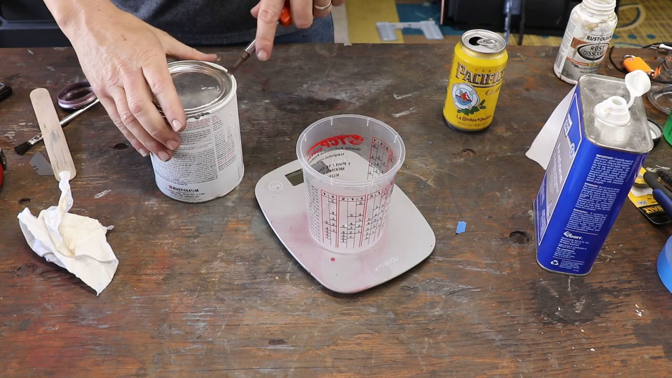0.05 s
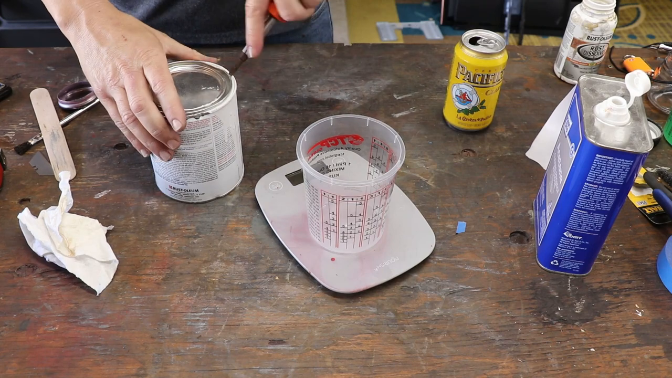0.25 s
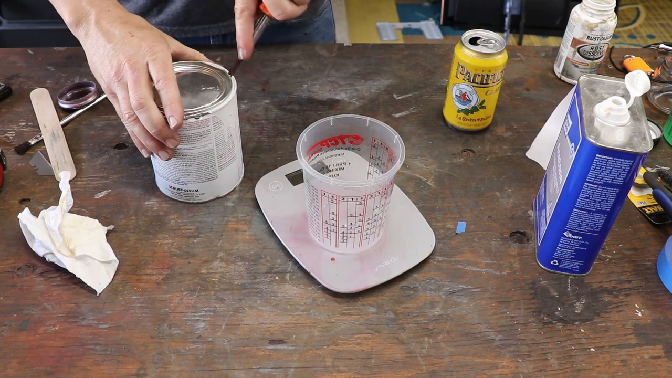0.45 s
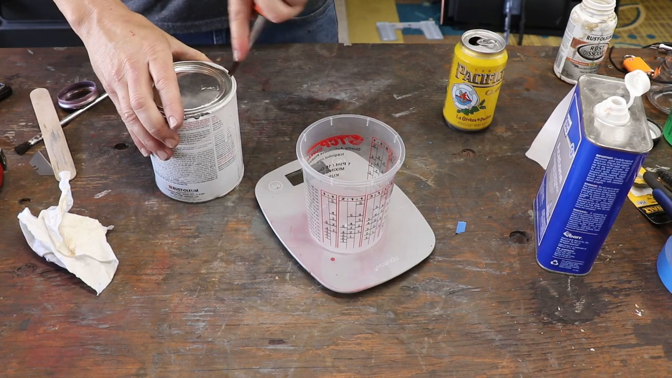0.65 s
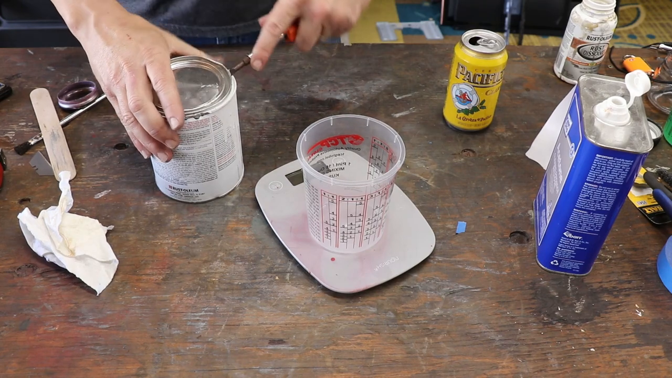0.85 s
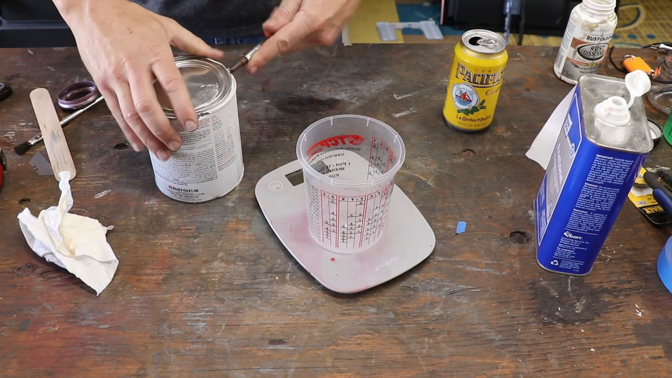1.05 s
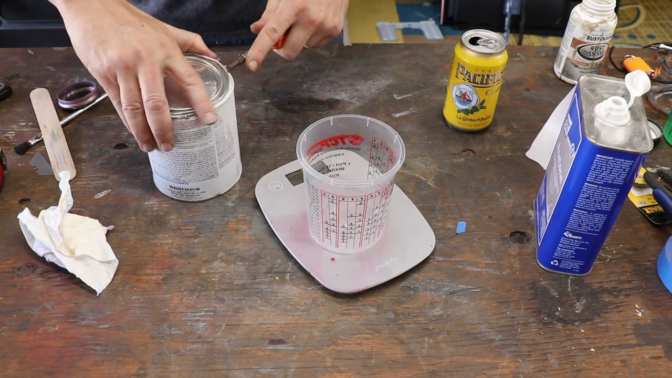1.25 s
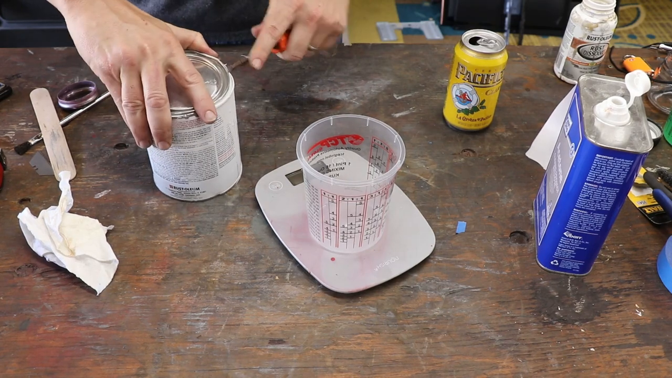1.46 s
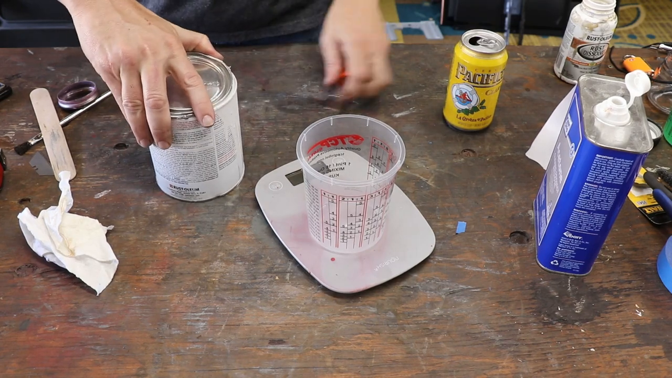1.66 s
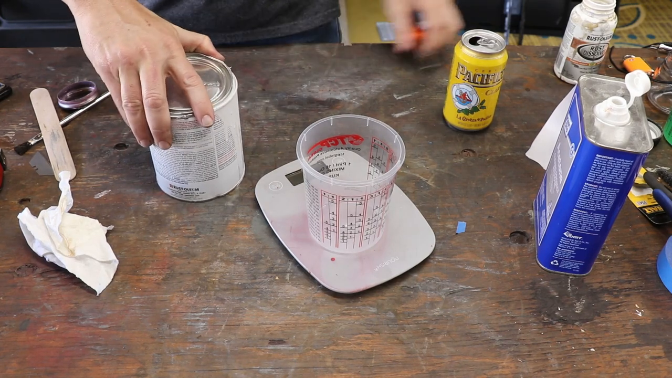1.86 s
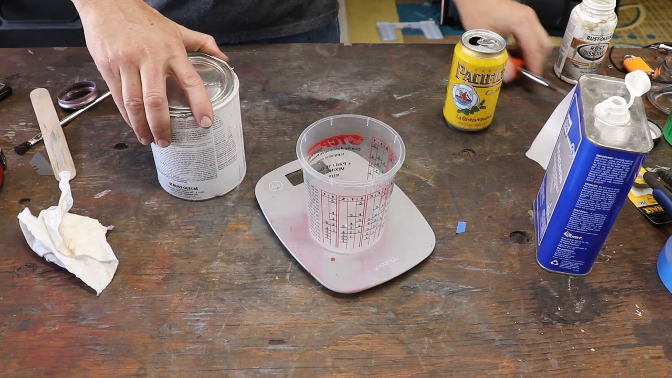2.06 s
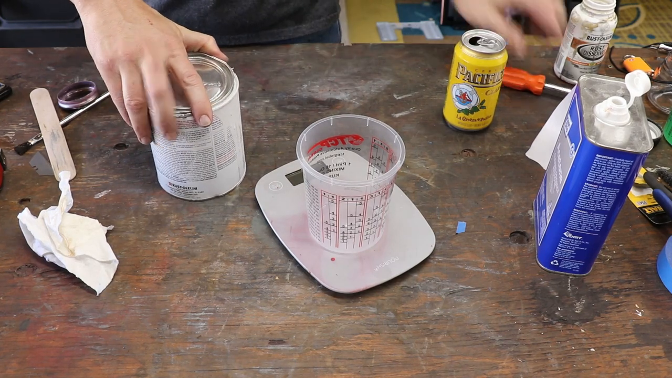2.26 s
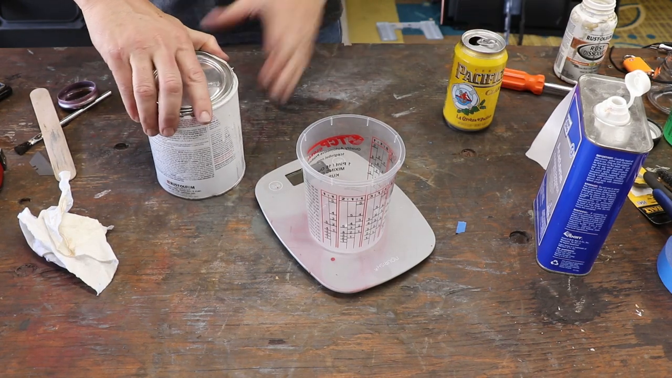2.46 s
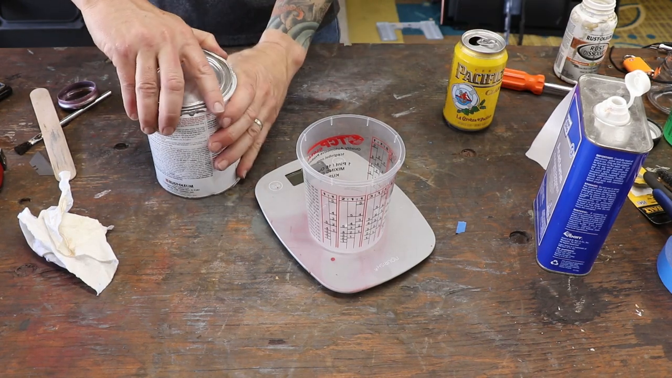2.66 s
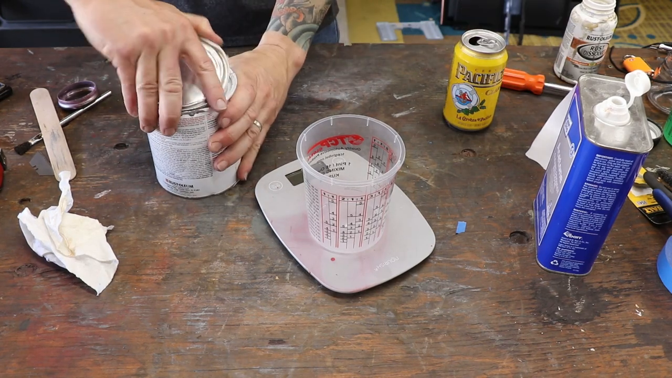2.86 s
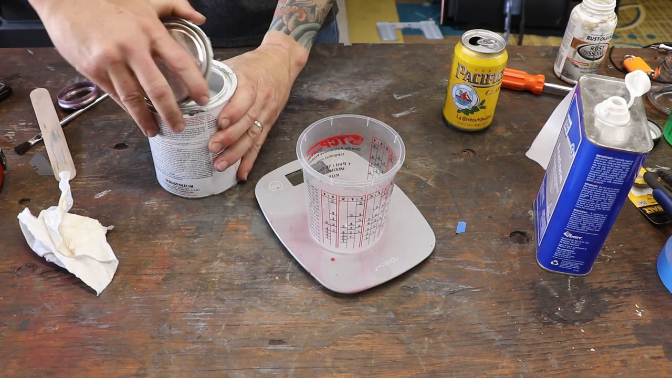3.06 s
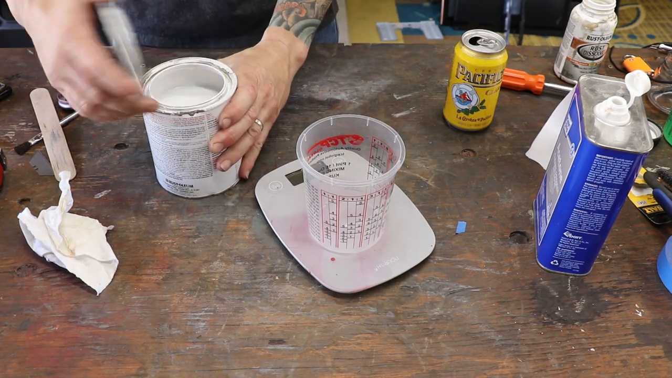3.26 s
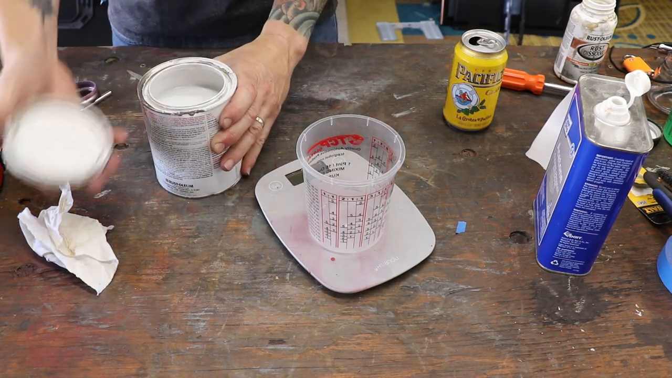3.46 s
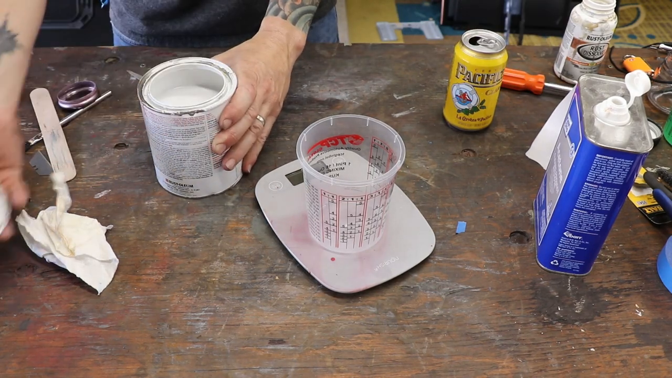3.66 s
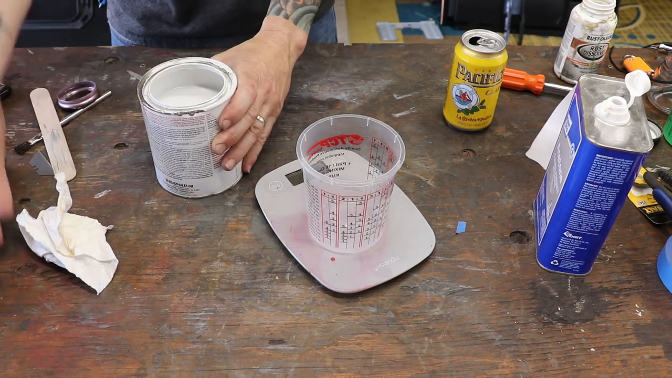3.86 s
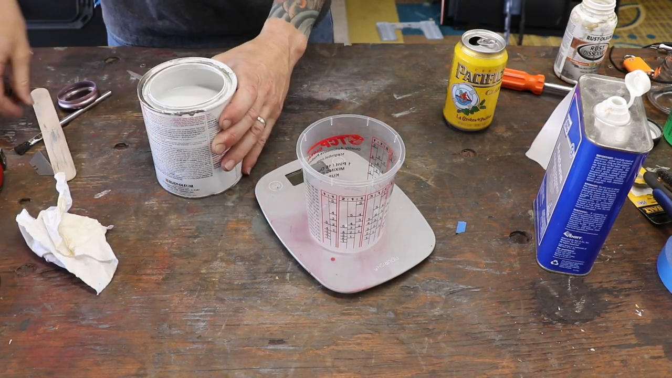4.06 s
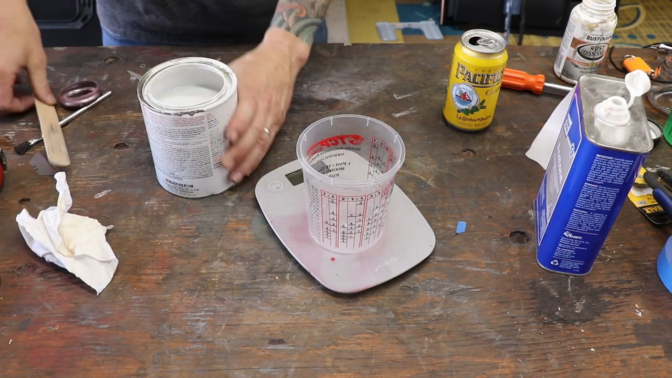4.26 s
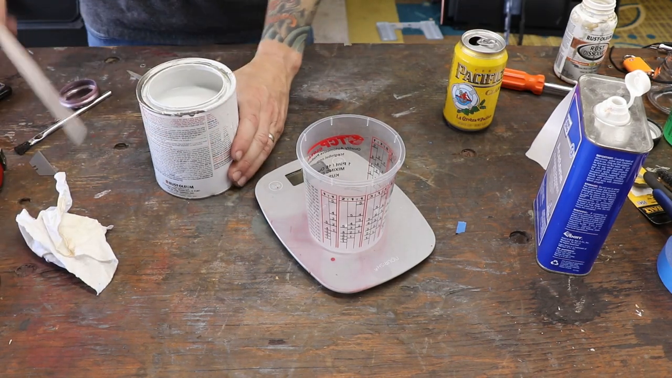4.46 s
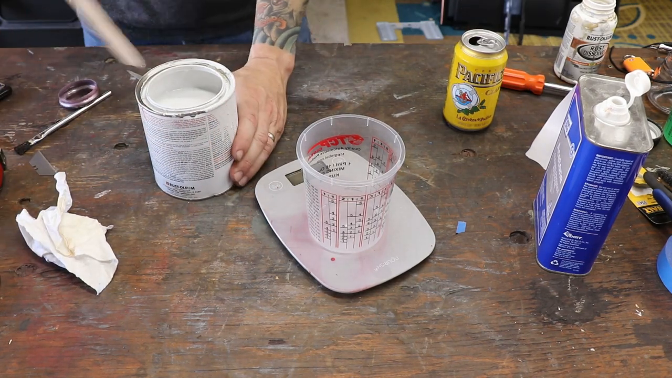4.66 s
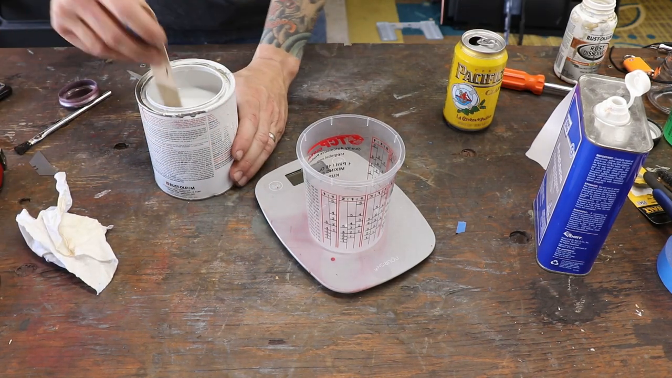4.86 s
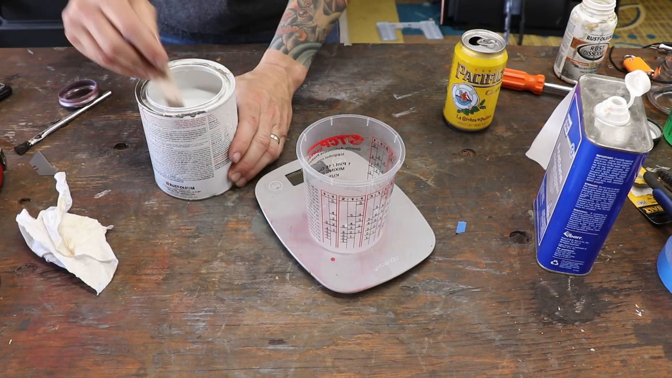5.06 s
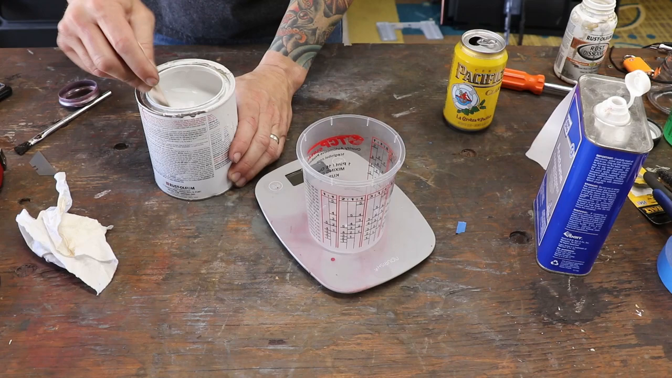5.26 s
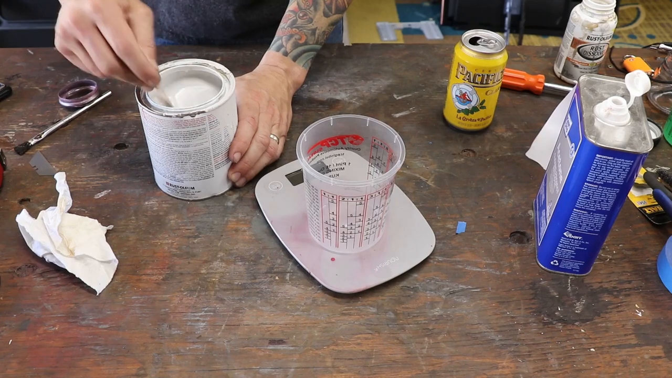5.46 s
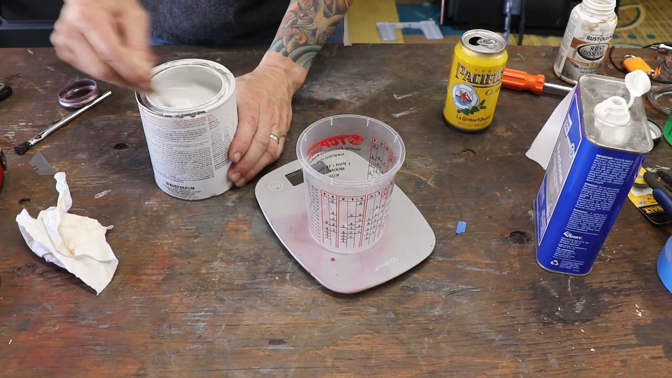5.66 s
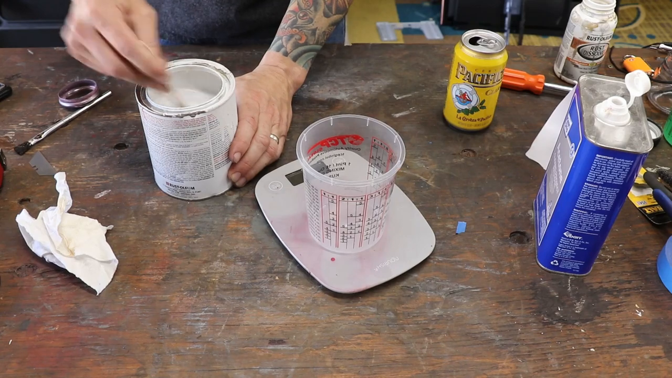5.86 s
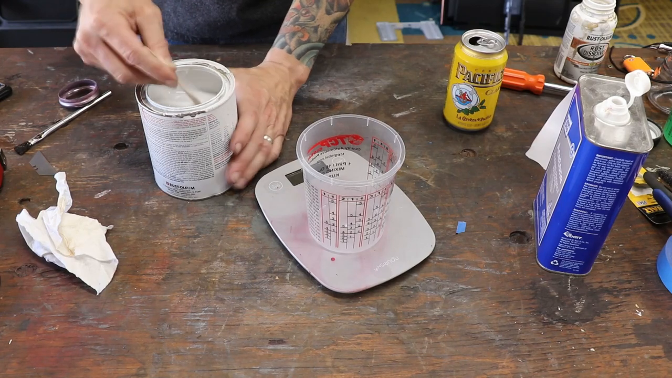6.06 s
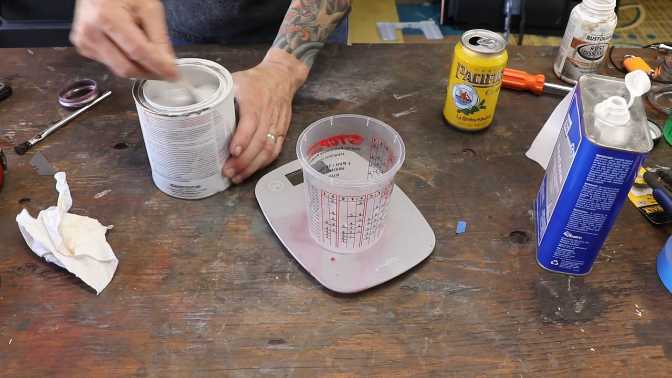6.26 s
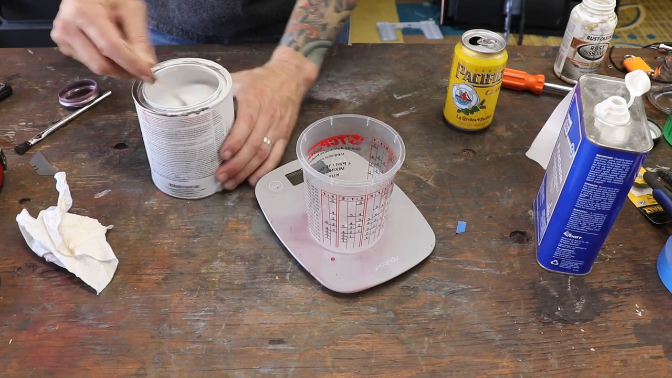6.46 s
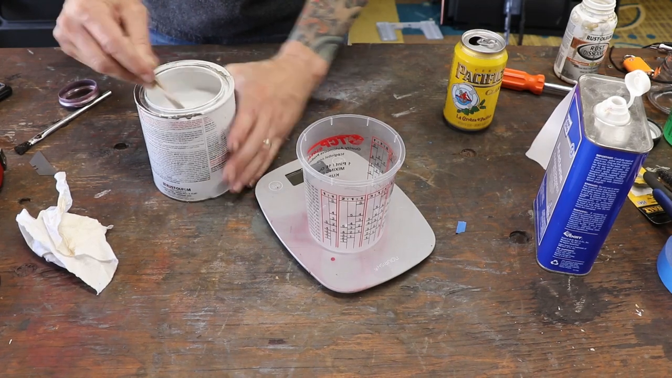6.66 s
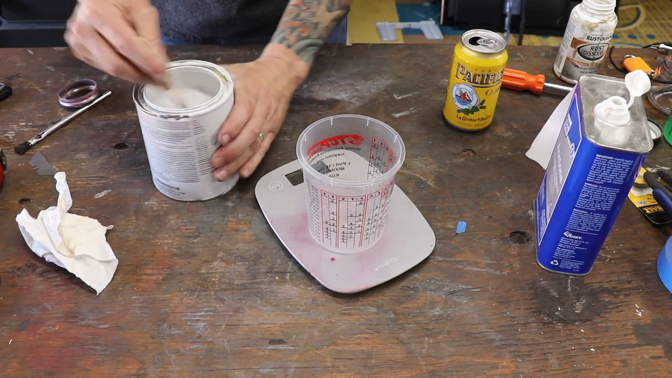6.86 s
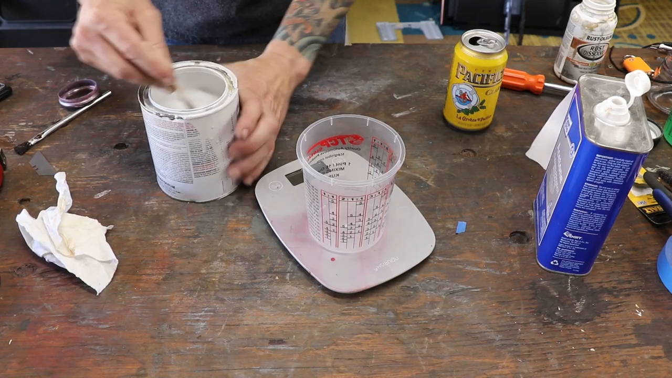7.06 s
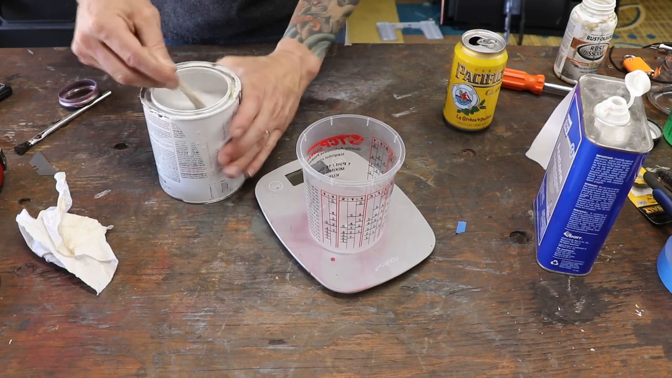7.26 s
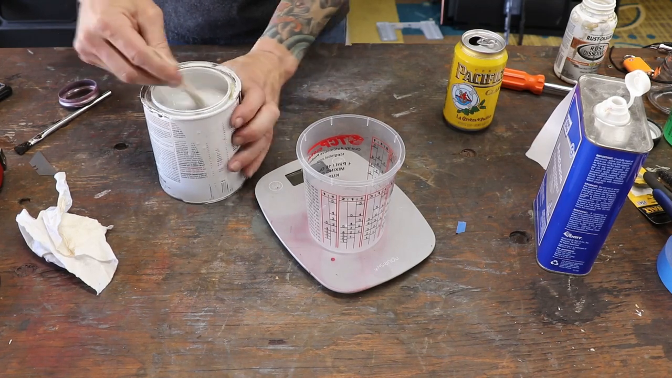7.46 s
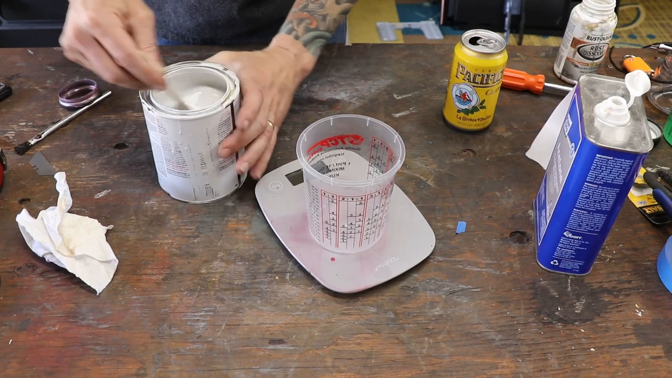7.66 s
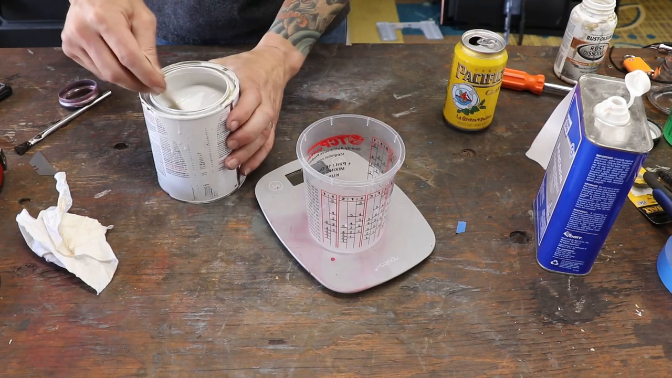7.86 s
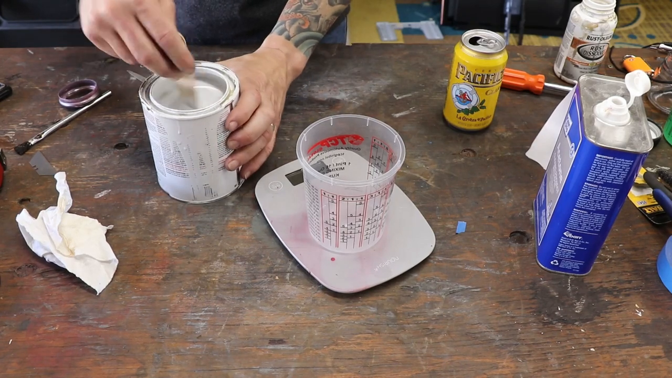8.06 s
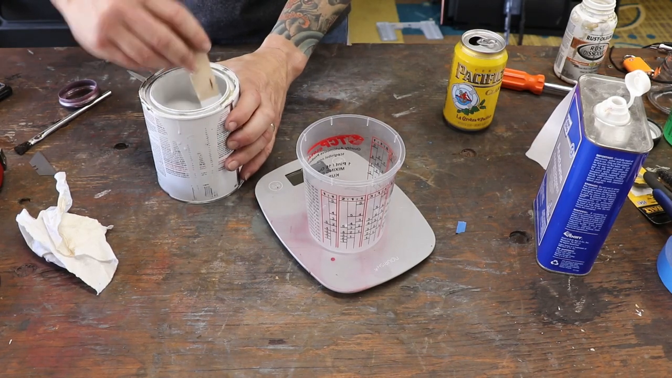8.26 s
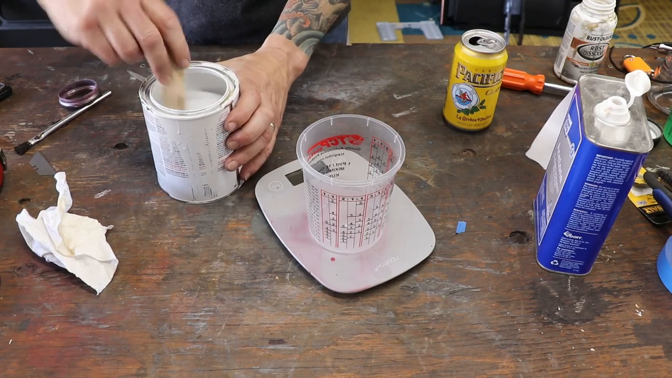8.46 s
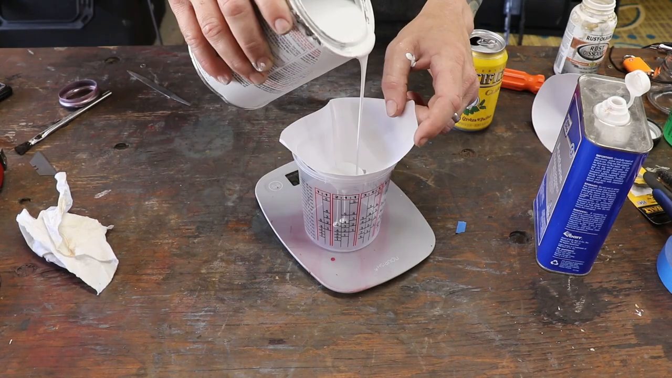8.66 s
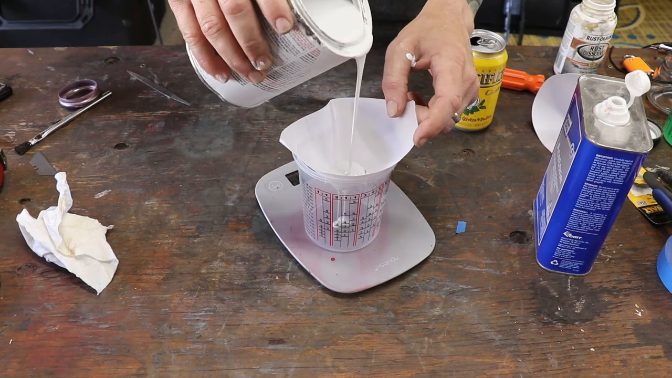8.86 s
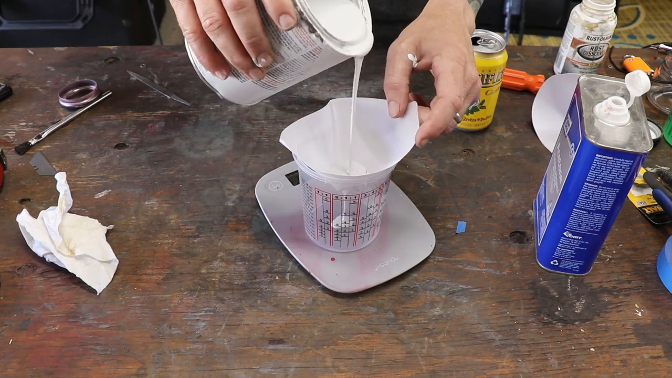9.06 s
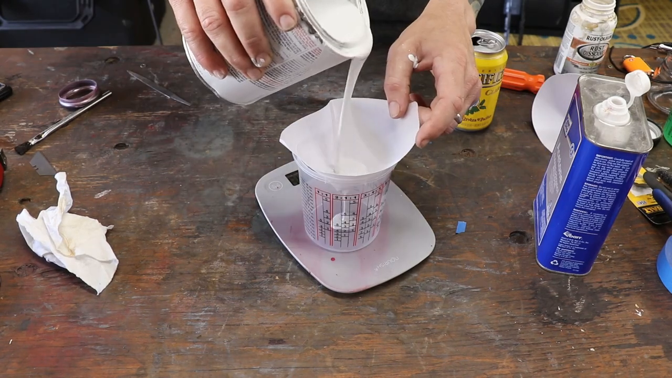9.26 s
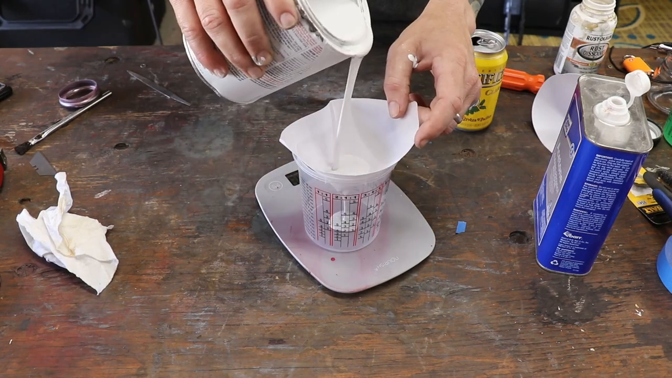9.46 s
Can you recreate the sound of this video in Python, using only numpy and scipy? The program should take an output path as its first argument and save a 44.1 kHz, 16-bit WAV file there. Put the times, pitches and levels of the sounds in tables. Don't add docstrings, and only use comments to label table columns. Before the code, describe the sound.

Screwdriver knocks at a full paint can, drops and rattles on the bench, lid pops off and clatters ringing, then a stick knocks while stirring.

```python
import sys
import numpy as np
from scipy import signal
from scipy.io import wavfile
from scipy.ndimage import uniform_filter1d, map_coordinates

SR = 44100
rng = np.random.default_rng(int(sys.argv[2]) if len(sys.argv) > 2 else 0)


def int16_out(signal):
    q = np.round(np.clip(np.atleast_2d(signal).T, -1, 1) * 32767)
    wavfile.write(sys.argv[1], SR, q.astype(np.int16))


N = 420273

# (time [s], knock level [dB], thump level [dB], clink level [dB])
PRYING = [(0.009, -10.5, -28, -25), (0.044, -23, -35, -100), (0.158, -20, -28.5, -39.5),
          (0.439, -34, -56, -54), (0.537, -46, -53, -54), (0.664, -41, -53, -57), (1.173, -48, -54, -56),
          (1.462, -46, -45, -73), (1.513, -27, -34, -48), (1.545, -39, -53, -61), (1.709, -38, -58, -48.5),
          (2.747, -41, -69, -51), (2.814, -53, -75, -64), (2.887, -58, -63, -54)]
# (time [s], knock level [dB], thump level [dB], clink level [dB])
DRIVER_DROP = [
    (2.058, -4, -7.5, -25.5),
    (2.206, -12.5, -10.5, -28),
    (2.226, -11.5, -14, -52),
    (2.271, -5, -29, -45),
    (2.281, -8.5, -26, -25),
    (2.319, -8, -21.5, -31),
    (2.347, -33, -40, -52),
    (2.393, -50, -48, -65),
]
# (time [s], knock level [dB], thump level [dB], clink level [dB])
LID_POP = [
    (2.943, -1.5, -17.5, -15),
]
# (time [s], knock level [dB], thump level [dB], clink level [dB])
LID_LIFT = [
    (3.05, -8.5, -23.5, -37),
    (3.205, -40, -52, -64),
    (3.53, -50, -68, -67),
]
# (time [s], knock level [dB], thump level [dB], clink level [dB])
LID_LANDS = [
    (3.804, -6, -25, -16),
    (3.859, -12, -50, -23),
]
# (time [s], knock level [dB], thump level [dB], clink level [dB])
LID_FALLS_FLAT = [
    (3.943, -21, -23.5, -12),
    (4.004, -12, -66, -18.5),
]
# (time [s], knock level [dB], thump level [dB], clink level [dB])
STICK_LIFT = [
    (4.198, -34, -32.5, -62.5),
    (4.227, -31, -29.5, -34.5),
]
# (time [s], knock level [dB], thump level [dB], clink level [dB])
STICK = [
    (4.344, -33, -54, -43.5),
    (4.562, -34, -44.5, -47),
    (4.934, -41, -66, -44),
    (4.964, -35, -46, -49),
    (5.002, -42, -48, -52),
    (5.081, -24, -60, -51),
]
# (time [s], knock level [dB], thump level [dB], clink level [dB])
STIRRING = [(5.126, -25.5, -29, -45), (5.304, -46, -35, -85), (5.41, -47, -65, -66), (5.734, -18, -27, -36),
            (5.906, -12, -36.5, -29), (6.078, -17, -22.5, -32), (6.223, -22.5, -51, -39.5),
            (6.254, -12.5, -15.5, -29.5), (6.389, -24.5, -84, -41.5), (6.421, -13, -18.5, -24),
            (6.539, -25, -37, -46), (6.583, -17, -14, -23), (6.743, -18.5, -16, -26.5),
            (6.887, -25, -43, -39.5), (6.924, -17, -14, -38.5), (7.016, -24, -23, -36),
            (7.093, -15, -13, -26.5), (7.264, -28, -33, -46), (7.45, -22.5, -21.5, -36.5),
            (7.625, -24, -28.5, -72), (7.644, -54, -41, -50), (7.801, -20, -19.5, -35),
            (7.912, -37, -39.5, -73), (8.036, -44, -30.5, -72), (8.184, -31, -40, -58),
            (8.271, -12.5, -74, -39.5), (8.312, -28, -24, -63)]
# (time [s], knock level [dB], thump level [dB], clink level [dB])
THUDS = [
    (0.252, -36, -31, -81),
    (0.982, -94, -32, -77),
    (1.248, -28, -35, -54),
    (2.671, -35, -21, -60),
    (5.553, -29.5, -19.5, -83),
    (5.734, -30, -29, -45),
]
# (time [s], knock level [dB], thump level [dB], clink level [dB])
TIP_SLIPS = [
    (0.757, -48, -69, -45),
    (0.767, -30, -67, -48),
    (0.782, -33, -52, -59),
    (1.261, -30, -40, -47.5),
    (1.399, -34, -60, -70),
    (6.328, -32, -68, -43.5),
    (7.016, -20, -17.5, -42),
]
BLOW_BANDS_HZ = (1200, 250, 3700, 9000)

# (frequency [Hz], level [dB], t60 [s])
FULL_CAN = [(109.6, -2.5, 0.3), (294.7, 9.5, 0.12), (276.2, 2.5, 0.28), (340.5, -5, 0.3), (570, -5, 0.065),
            (764, -15.5, 0.6), (864, -3.5, 0.058), (1406, -11.5, 0.22), (1370, 5, 0.0084),
            (2095, -9.5, 0.056), (2420, -15, 0.34), (2346, -0.5, 0.058), (3326, -1, 0.075)]
# (frequency [Hz], level [dB], t60 [s])
BENCH = [(120.5, -18, 0.47), (205, -32, 0.068), (291, 15.5, 0.092), (297.4, -3.5, 0.85), (360, 1.5, 0.48),
         (513, -10, 0.3), (653, -1.5, 0.18), (815, -13, 0.71), (965, -32, 0.18), (1470, -18, 0.12),
         (1600, -8, 0.41), (1890, -24, 0.31), (3120, -13, .15)]
# (frequency [Hz], level [dB], t60 [s])
BENCH_TOP = [(83.5, 3, 0.076), (113, 5, 0.19), (160, -2, 0.16), (259, -5, 0.18), (375, -3, 0.12)]
# (frequency [Hz], level [dB], t60 [s])
DRIVER_HANDLE = [(284, -16, 0.25), (501, 4.5, 0.17), (700, 7, 0.043), (774, -5, 0.065), (872, 1, 0.12),
                 (1105, -10, 0.039), (1620, -2, 0.07), (1990, -1.5, 0.059), (3160, -1, .15)]
# (frequency [Hz], level [dB], t60 [s])
PRIED_LID = [(478, 0.5, 0.21), (642, 1.5, 0.059), (721, 0, 0.32), (999, -2, 0.098), (1201, -12.5, 0.11),
             (1500, -14.5, 0.2), (3260, 13, 0.027), (3830, 13, 0.031)]
SEATED_LID_HZ = [388, 615, 985, 1340, 1669, 1655, 1841, 2190, 2724, 2840, 3174, 3190, 3408]
# (level [dB], t60 [s])
SEATED_LID = [(-0.5, 0.13), (-20, 0.049), (-5.5, 0.29), (-7, 0.097), (10.5, 0.022), (-19, 0.23),
              (-18, 0.25), (-20, 0.24), (-21, 0.26), (-19, 0.17), (12, 0.045), (8, 0.19), (-1, 0.18)]
# (frequency [Hz], level [dB], t60 [s])
LID_RIM = [(9800, 6, .01), (11500, 7, .008), (13200, 8, .008)]
# (frequency [Hz], level [dB], t60 [s])
OPEN_CAN = [(172, 7.5, 0.092), (493, 0.5, 0.15), (935, -6.5, 0.15)]
EDGE_LID_HZ = [345, 700, 1045, 1260, 1680, 2051, 2918, 3157, 3262, 3569, 3849, 3967, 6590]
# (level [dB], t60 [s])
LID_ON_EDGE = [(1, 0.17), (16, 0.027), (8, 0.24), (-18, 0.77), (-5, 0.32), (-19, 0.46), (-12, 0.26),
               (-6, 0.35), (-14, .14), (2, 0.68), (-16, .3), (-8, 0.41), (-14, 0.14)]
FREE_LID_HZ = [1047, 1681, 2042, 2088, 2420, 2897, 3255, 3566, 4250, 4521, 4705, 6585, 6640, 8220]
# (level [dB], t60 [s])
FREE_LID = [(2, 0.29), (-8, 0.49), (-3, 0.38), (-2, 0.34), (11, 0.041), (-4, 0.32), (5.5, 0.12),
            (-3.5, 0.21), (-5, 0.22), (-5, 0.2), (-11, 0.13), (4.5, 0.14), (-2, 0.31), (-17, .12)]
FLAT_LID_HZ = [1453, 1647, 1690, 2131, 2460, 2600, 2897, 3150, 3671, 4043, 4255, 4519, 5728, 6589]
# (level [dB], t60 [s])
FLAT_LID = [(-13.5, 0.33), (-10, 0.42), (5, 0.092), (2.5, 0.29), (-14, .3), (-16, 0.47), (8.5, 0.364),
            (-4, 0.31), (-24, 0.22), (-9, 0.29), (-6, 0.16), (-10, 0.35), (-6, 0.3), (12, 0.15)]
# (frequency [Hz], level [dB], t60 [s])
LID_SHIMMER = [(4860, -10, 0.34), (5030, -7, .3), (5470, -1, .15), (5745, -5, 0.35), (6400, -3, 0.23),
               (6850, -6, .25), (7200, -14, .15), (7600, -2, .18), (7730, -9, .25), (7876, -9, 0.15),
               (8200, -7, .25), (8300, -10, .22), (9400, -7, 0.11), (9700, -12, 0.13)]
# (frequency [Hz], level [dB], t60 [s])
WOOD_STICK = [(368, 2.5, 0.13), (2140, -12, 0.082), (3270, -12, 0.085), (5960, 3, 0.031), (7350, -6, 0.052),
              (8100, -5, 0.043)]

# (time [s], frequency [Hz], level [dB])
CHIRPS = [
    (0.534, 2260, -35),
    (1.174, 2340, -38),
    (4.993, 2116, -33),
]
# (time [s], low level [dB], low frequency [Hz], high frequency [Hz], high level [dB])
WALL_NOTES = [(5.127, -24.5, 787, 2040, -46), (5.734, -20.5, 823, 2300, -28),
              (5.908, -25, 790, 2410, -27.5), (6.078, -27, 776, 2450, -43), (6.255, -17, 564, 2280, -28),
              (6.421, -16, 855, 2080, -20.5), (6.584, -21, 774, 2040, -26), (6.744, -19.5, 870, 2100, -24),
              (6.924, -21, 850, 2160, -32.5), (7.017, -23, 640, 2420, -57), (7.095, -11.5, 535, 2240, -38),
              (7.263, -36, 558, 2470, -46), (7.452, -32, 760, 2475, -28.5), (7.625, -33, 790, 2200, -48),
              (7.8, -23, 595, 1910, -51), (8.312, -23, 816, 2330, -44)]
# (time [s], frequency [Hz], level [dB], t60 [s])
CAN_NOTES = [(0.011, 647, -13.5, .06), (0.011, 1002, -29, .2), (0.012, 1415, -36, 0.35),
             (.047, 598, -27, 0.14), (0.048, 441, -22, 0.095), (2.283, 920, -18, 0.089),
             (2.322, 282.6, -18.5, 0.29), (2.944, 1669, -24, 0.018), (2.946, 1680, -26, 0.31),
             (3.806, 364, -20, 0.13), (1.515, 700, -33.5, .15), (2.323, 750, -19, .06),
             (2.946, 985, -22, 0.2), (2.945, 3177, -10.5, 0.061), (2.945, 2260, -16, .03),
             (3.806, 1045, -12, 0.25), (4.006, 2897, -23.5, 0.47), (5.086, 800, -45, 0.073),
             (5.16, 332, -38, 0.23), (5.305, 800, -36, 0.046), (5.345, 150, -33, .08),
             (5.365, 377, -35, 0.17), (6.255, 900, -25.5, .2), (6.46, 1370, -34, 0.13),
             (5.736, 359, -16.5, 0.17), (5.772, 401, -24, 0.14), (5.95, 324, -30, .2),
             (5.913, 546, -31, 0.098), (6.748, 1715, -29, 0.091), (7.02, 550, -34, 0.26),
             (7.254, 390, -26.5, 0.076)]

# (time [s], length [s], level [dB])
METAL_SCRAPES = [
    (0, 0.012, -46.5),
    (.045, 0.045, -65),
    (2.18, .04, -65),
    (2.215, 0.061, -68),
    (2.29, 0.068, -68),
    (2.345, 0.051, -68),
    (2.96, 0.11, -46),
    (3.06, 0.055, -58),
    (3.1, 0.045, -63),
    (6.95, 0.056, -52.5),
]
# (time [s], length [s], level [dB])
SKIN_SWISHES = [(1.27, 0.091, -61.5), (2.55, 0.029, -65), (2.58, 0.068, -48), (2.655, 0.055, -52),
                (3.645, 0.032, -55.5), (3.72, 0.084, -58), (4.24, 0.07, -57), (4.28, 0.066, -49),
                (4.322, 0.034, -46.5), (4.405, 0.038, -55), (4.483, 0.045, -53), (4.54, 0.04, -55),
                (4.68, 0.079, -52), (4.79, 0.03, -48.5), (4.885, 0.033, -58), (4.93, 0.097, -50),
                (5.06, .06, -58), (5.13, 0.058, -61), (7.32, 0.074, -59.5), (7.92, 0.068, -56),
                (8.14, 0.064, -58), (8.18, 0.045, -49), (8.44, 0.077, -65), (8.58, .029, -49.5)]
# (time [s], length [s], level [dB])
PAINT_STROKES = [(1.10, 0.12, -62.5), (1.93, 0.023, -60), (3.5, 0.16, -66), (5.03, 0.052, -97),
                 (5.31, 0.053, -60), (5.38, 0.047, -57.5), (5.56, 0.049, -55.5), (6.52, 0.067, -53),
                 (6.84, 0.096, -55), (7.19, .15, -56), (7.52, 0.125, -54), (7.62, 0.081, -61),
                 (8.04, 0.054, -55.5), (8.37, 0.036, -59.5), (8.501, 0.083, -57.5), (9.2, 0.031, -60)]
# (time [s], level [dB])
LEAN = [(0.0, -66), (0.29, -62), (1.41, -55), (2.04, -83), (2.5, -68), (2.67, -50), (2.84, -63),
        (3.45, -99), (4.48, -58), (4.86, -113), (5.55, -79), (6.13, -53), (6.4, -46), (7.35, -49),
        (8.36, -49), (8.6, -65), (9.53, -71)]

# (frequency [Hz], crack level [dB], tail level [dB], tail t60 [s])
CRACK = [(40, -60, -44, 0.34), (118, -14, -27, 0.57), (277, -4.5, -11.5, 0.37), (616, -2.5, -15.5, 0.39),
         (1280, -11.5, -20.5, 0.39), (3620, 6.5, -11.5, 0.29), (4500, -1, -29.5, 0.47),
         (6830, 8.5, -2, 0.11), (11260, -7.5, -26, 0.2), (15300, -31, -44, 0.098)]
# (frequency [Hz], level [dB])
SKIN_HISS = [(300, -31), (1000, -2.5), (2500, 2.5), (5000, 2.5), (6500, 3), (9000, 11.5), (13000, -6.5),
             (15500, -1)]
# (frequency [Hz], level [dB])
DRAG = [(150, -5.5), (400, -1), (1000, 8.5), (2500, -26), (5000, -14.5), (9000, -9.5)]
# (frequency [Hz], level [dB])
RUMBLE = [(20, -21), (40, -10.5), (80, -16.5), (130, -14), (250, -41)]
# (frequency [Hz], level [dB per Hz])
WORKSHOP = [(20, -33), (60, -31), (105, 9), (160, -14.5), (320, -3), (600, -11), (1170, -6), (2000, -16.5),
            (3300, -24), (5000, -36), (6800, -24.5), (10000, -30.5), (13000, -46), (15800, -45)]
# (frequency [Hz], left minus right level [dB])
SIDE_LEAN = [(100, -0.5), (700, 0), (2300, -2.5), (3300, -1), (4500, -2.5), (8000, -1.5), (13000, 1.5)]
BAND_EDGES_HZ = np.minimum(20 * 2 ** np.arange(0, 10.1, .4), 16500)

RING_GIVE = 0.25
FIRM_BLOW_DB = -15
LID_TAIL_LOSS_DB = 3
CHIRP_T60_S, LOW_NOTE_T60_S, HIGH_NOTE_T60_S = .07, 0.066, 0.035
LOW_NOTE_DB, HIGH_NOTE_DB = 1, 7
ROCK_FROM_S, ROCK_GAP_S = 2.235, 0.023
ROCK_DB, ROCK_LOSS_DB, ROCK_THUMP_DB, ROCK_CLINK_DB = -35, 18, -20, -29
OVERTONE_LOW_HZ, OVERTONE_HIGH_HZ = 1315, 9920
OVERTONE_DB, OVERTONE_T60_S, OVERTONE_UNEVEN_DB = -21, 0.3, 2.5
METAL_TILT_DB, SKIN_TILT_DB, PAINT_TILT_DB, SLOP_TILT_DB = -7.5, 6, -3.5, -2.5
SLIDE_FADE_DB = 3
SLOP_FROM_DB = -24.5
SLOP_LAG_S, SLOP_LONG_S, SLOP_DB = 0.0056, 0.051, -54.5
DRAG_DB, DRAG_FOLLOWS, DRAG_WANDER_DB = -53, 0.031, 1.5
WORKSHOP_DB = -46.5
SNAP_S, SNAP_HOLD_S, SNAP_LOOSE = 2.946, .035, .25


def from_db(db):
    return np.exp(np.asarray(db) * (np.log(10) / 20))


def at_hz(points, hz, column=1):
    points = np.array(points)
    return np.interp(np.log(hz), np.log(points[:, 0]), points[:, column])


def drift(rate):
    points = rng.standard_normal(600)
    return np.interp(np.arange(N) / SR * rate % 599, np.arange(600), points)


def on_body(rows, sheen_db, ring_db):
    blows = []
    for s, knock, thump, clink in rows:
        lightness_db = FIRM_BLOW_DB - max(knock, thump)
        blows.append((s, knock, thump, clink, clink + sheen_db, ring_db + RING_GIVE * lightness_db))
    return blows


def blow_db(blows, hz):
    order = np.argsort(BLOW_BANDS_HZ)
    bands = np.log(BLOW_BANDS_HZ)[order]
    rows = np.array(blows)[:, 1:5][:, order]
    inside = np.array([np.interp(np.log(hz), bands, row) for row in rows])
    octaves_above = max(np.log2(hz / BLOW_BANDS_HZ[3]), 0)
    return inside + (rows[:, 3] - rows[:, 2] + 8) * octaves_above


def click_train(blows, db):
    clicks = np.full(N, 1e-18)
    clicks[((np.array(blows)[:, 0] + .0025) * SR).astype(int)] = from_db(db)
    return clicks


def struck(blows, modes, ring_db, uneven_db):
    out = np.zeros(N)
    chance = rng.standard_normal((len(blows), len(modes)))
    first_s, last_s = np.min(blows, axis=0)[0], np.max(blows, axis=0)[0]
    for (hz, db, t60), uneven in zip(modes, chance.T):
        after_db = -12 + (np.array(blows)[:, 5] + 12) * np.clip(t60 / .1 - .7, 0, 1)
        spread_db = np.clip(uneven_db, 0, 3.5) * uneven * min(hz / 900, 1)
        clicks = click_train(blows, blow_db(blows, hz) + after_db + db + ring_db + spread_db)
        r = from_db(-60 / (t60 * SR))
        w = 2 * np.pi * hz / SR
        heard = slice(int(first_s * SR), int((last_s + 2 * t60) * SR))
        out[heard] += signal.lfilter([0, np.sin(w)], [1, -2 * r * np.cos(w), r * r], clicks[heard])
    return out


def pitched(pitches_hz, rings):
    return [(hz, *ring) for hz, ring in zip(pitches_hz, rings)]


def rocking(count):
    chance = rng.standard_normal((count, 2))
    touch = np.arange(count)
    db = ROCK_DB - ROCK_LOSS_DB * touch + 2.9 * chance[:, 1]
    s = ROCK_FROM_S + ROCK_GAP_S * (touch + 0.42 * chance[:, 0])
    return list(zip(s, db, db + ROCK_THUMP_DB, db + ROCK_CLINK_DB))


def notes(rows):
    out = np.zeros(N + SR)
    for s, hz, db, t60 in rows:
        t = np.arange(int(np.clip(t60, .01, .9) * SR)) / SR
        start = int(s * SR)
        out[start:start + len(t)] += from_db(db - 60 * t / t60) * np.sin(2 * np.pi * hz * t)
    return out[:N]


def chirps():
    rim = [(*chirp, CHIRP_T60_S) for chirp in CHIRPS]
    low = [(s + 0.00291, hz, db + LOW_NOTE_DB, LOW_NOTE_T60_S) for s, db, hz, *high in WALL_NOTES]
    high = [(s + 0.00293, hz, db + HIGH_NOTE_DB, HIGH_NOTE_T60_S) for s, *low_note, hz, db in WALL_NOTES]
    return notes(rim + low + high + CAN_NOTES)


def overtones(blows, count):
    places = np.arange(count) ** 2 * (np.sqrt(5) - 1) / 2 % 1
    rows = []
    for place in places:
        hz = OVERTONE_LOW_HZ * (OVERTONE_HIGH_HZ / OVERTONE_LOW_HZ) ** place
        t60 = OVERTONE_T60_S * (1.3 - 0.67 * place)
        for blow, db in zip(blows, blow_db(blows, hz)):
            favour_db = OVERTONE_UNEVEN_DB * np.sin(hz * blow[0])
            rows.append((blow[0] + .003, hz, db + OVERTONE_DB + favour_db, t60))
    return notes(rows)


def dying(clicks, t60):
    return signal.lfilter([1], [1, -from_db(-60 / (t60 * SR))], clicks)


def cracking(blows, hz):
    clicks = click_train(blows, blow_db(blows, hz) + at_hz(CRACK, hz))
    crack = dying(clicks, 0.011 + 1.27 / hz)
    return uniform_filter1d(crack, size=int(1.5 * SR / hz) + 130)


def room_tail(blows, hz, grain):
    echo_db = blow_db(blows, hz) + np.array(blows)[:, 5] + 10.0 + at_hz(CRACK, hz, column=2)
    echoes = click_train(blows, echo_db)
    t60 = at_hz(CRACK, hz, column=3)
    return (dying(echoes, t60) - dying(echoes, 0.027)) * grain ** 0.78


def swishing(hz):
    slops = [(s + SLOP_LAG_S, SLOP_LONG_S, SLOP_DB) for s, knock, *rest in STIRRING if knock > SLOP_FROM_DB]
    out = np.zeros(N)
    octaves = np.log2(max(hz, 350) / 8000)
    for slides, tilt_db in ((METAL_SCRAPES, METAL_TILT_DB), (SKIN_SWISHES, SKIN_TILT_DB),
                            (PAINT_STROKES, PAINT_TILT_DB), (slops, SLOP_TILT_DB)):
        for s, long, db in slides:
            start = int(s * SR)
            fade_db = np.linspace(0, SLIDE_FADE_DB, int(long * SR))[:N - start]
            out[start:start + len(fade_db)] += from_db(db + tilt_db * octaves + fade_db)
    return uniform_filter1d(out, size=500)


def noise_bands():
    white = rng.standard_normal((2, 2, N))
    for k, (low, high) in enumerate(zip(BAND_EDGES_HZ, BAND_EDGES_HZ[1:])):
        band = signal.butter(2, [low, high], "band", fs=SR, output="sos")
        pair = signal.sosfilt(band, white[k % 2])
        yield np.sqrt(low * high), high - low, pair / np.sqrt(4 * (high - low) / SR)


def cracks_rubs_and_hum(blows):
    rumble_db = np.interp(np.arange(N) / SR, *np.transpose(LEAN))
    drag_db = DRAG_DB + DRAG_FOLLOWS * (rumble_db - rumble_db.mean()) + DRAG_WANDER_DB * drift(4)
    dragging, leaning = from_db(drag_db), from_db(rumble_db)
    hz_grid = np.arange(20, 16000.)
    hum_db = WORKSHOP_DB - 10 * np.log10(np.sum(from_db(at_hz(WORKSHOP, hz_grid)) ** 2))
    grain = from_db(0.93 * drift(41) + 2.5 * drift(170))
    out = 0
    for hz, width, (mid, side) in noise_bands():
        crack = cracking(blows, hz)
        tail = room_tail(blows, hz, grain)
        hiss = grain * swishing(hz) * from_db(at_hz(SKIN_HISS, hz) - 13.0 + 2.8 * drift(25))
        drag = grain * dragging * from_db(-10.0 + at_hz(DRAG, hz))
        rumble = leaning * from_db(6.5 + at_hz(RUMBLE, hz))
        flicker = from_db(1.2 * drift(6))
        hum = from_db(hum_db + 0.5 + at_hz(WORKSHOP, hz)) * flicker * np.sqrt(width)
        power = crack ** 2 + tail ** 2 + hiss ** 2 + drag ** 2 + rumble ** 2 + hum ** 2
        direct = .5 * crack ** 2
        out = out + np.sqrt(power + direct) * mid + np.sqrt(power - direct) * side * [[1], [-1]]
    return out


def scene():
    pry = on_body(PRYING, sheen_db=-5.0, ring_db=-14.5)
    slips = on_body(TIP_SLIPS, sheen_db=12.5, ring_db=-21.0)
    thuds = on_body(THUDS, sheen_db=-1.0, ring_db=-16.5)
    drop = on_body(DRIVER_DROP, sheen_db=-11.5, ring_db=-15.0)
    rocks = on_body(rocking(count=10), sheen_db=-17, ring_db=-24)
    pop = on_body(LID_POP, sheen_db=-12.0, ring_db=-21.0)
    lift = on_body(LID_LIFT, sheen_db=15.0, ring_db=-13.5)
    lands = on_body(LID_LANDS, sheen_db=-18, ring_db=-8.5)
    flat = on_body(LID_FALLS_FLAT, sheen_db=-21.0, ring_db=-7.5)
    stick = on_body(STICK_LIFT, sheen_db=19.5, ring_db=-17.0)
    stick += on_body(STICK, sheen_db=-11.0, ring_db=-16.5)
    stir = on_body(STIRRING, sheen_db=-3.0, ring_db=-15.5)

    bodies = struck(pry + stir + slips, FULL_CAN, ring_db=6.0, uneven_db=4.5)
    bodies += struck(pry[:10], PRIED_LID, ring_db=3.0, uneven_db=5.5)
    bodies += struck(thuds, BENCH_TOP, ring_db=6.5, uneven_db=6.0)
    bodies += struck(drop[:1], BENCH, ring_db=-0.5, uneven_db=4.5)
    bodies += struck(drop[1:], DRIVER_HANDLE, ring_db=1.5, uneven_db=-2.5)
    bodies += struck(rocks, DRIVER_HANDLE, ring_db=12.0, uneven_db=6.0)
    bodies += struck(pop + lift, pitched(SEATED_LID_HZ, SEATED_LID), ring_db=4.0, uneven_db=-1.5)
    bodies += struck(pop, LID_RIM, ring_db=18.0, uneven_db=-2)
    bodies += struck(lift[:1], OPEN_CAN, ring_db=11.0, uneven_db=-2)
    bodies += struck(lands, pitched(EDGE_LID_HZ, LID_ON_EDGE), ring_db=3.0, uneven_db=-2)
    bodies += struck(flat[:1], pitched(FREE_LID_HZ, FREE_LID), ring_db=4.5, uneven_db=-1.5)
    bodies += struck(flat[1:], pitched(FLAT_LID_HZ, FLAT_LID), ring_db=2.5, uneven_db=-1.5)
    bodies += struck(stick, WOOD_STICK, ring_db=14.5, uneven_db=-3.0)
    bodies += chirps()
    bodies = signal.sosfilt(signal.butter(3, 85, "high", fs=SR, output="sos"), bodies)

    shimmer = struck(lands + flat, LID_SHIMMER, ring_db=-2.0, uneven_db=3.0)
    clatter = [(*blow[:5], blow[5] - LID_TAIL_LOSS_DB) for blow in lands + flat]
    noisy = cracks_rubs_and_hum(pry + thuds + drop + pop + lift + clatter + stick + stir + slips + rocks)
    return bodies + noisy + shimmer + overtones(lands + flat, count=48)


def sped_up(x, scatter_rad, apart_rad, step_hz, halo_rad, hold_s):
    hz, s, frames = signal.stft(x, SR, nperseg=1024, noverlap=768)
    where = np.meshgrid(hz / step_hz, s / hold_s, indexing="ij")
    broad = [where[0] / 3, where[1] * 1.5]
    calm = np.clip(hz / 900, .3, 1)[:, None]
    shared = scatter_rad * calm * map_coordinates(rng.standard_normal((400, 200)), where, order=1, mode="wrap")
    loose = 1 - (1 - SNAP_LOOSE) * np.exp(-((s - SNAP_S) / SNAP_HOLD_S) ** 4)
    for frame, lean in zip(frames, (.5, -.5)):
        apart = map_coordinates(rng.standard_normal((400, 200)), broad, order=1, mode="wrap")
        wander = shared + apart_rad * apart
        bin_steps = rng.standard_normal((len(hz), 200))
        halo = halo_rad * bin_steps[:, (s / hold_s).astype(int) % 200]
        side_gain = from_db(lean * at_hz(SIDE_LEAN, hz + 1))[:, None]
        frame *= np.exp(1j * (loose * wander + halo)) * side_gain
    return signal.istft(frames, SR, nperseg=1024, noverlap=768)[1][:, :N]


def roll_off(x):
    return signal.sosfilt(signal.butter(12, 15840, fs=SR, output="sos"), x)


def record(dry):
    fast = sped_up(dry, scatter_rad=2.2, apart_rad=1.9, step_hz=240, halo_rad=.42, hold_s=.2)
    rounded = np.tanh(fast / 1.05) * 1.05
    top_cut = signal.cheby2(20, 70, 15780, fs=SR, output="sos")
    return roll_off(signal.sosfilt(top_cut, rounded))


dry = scene()
out = record(dry)
int16_out(out)
```